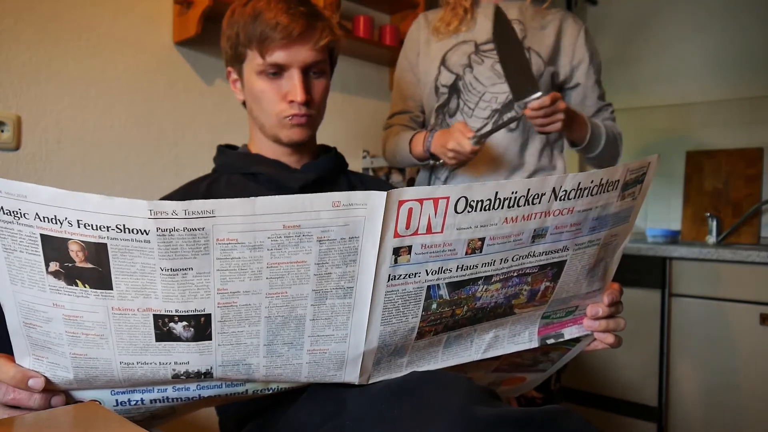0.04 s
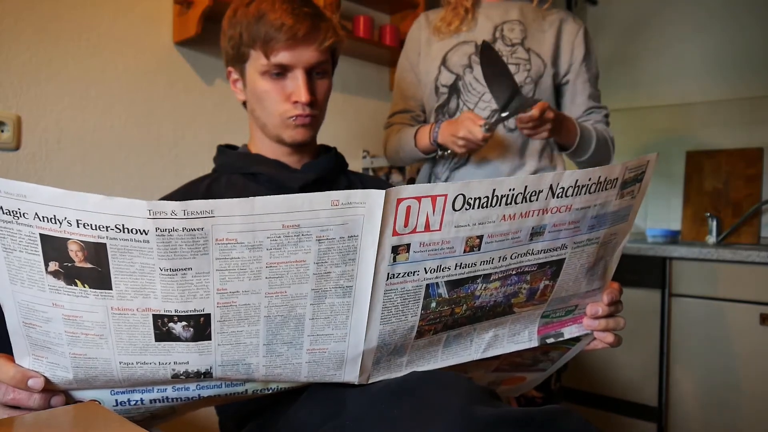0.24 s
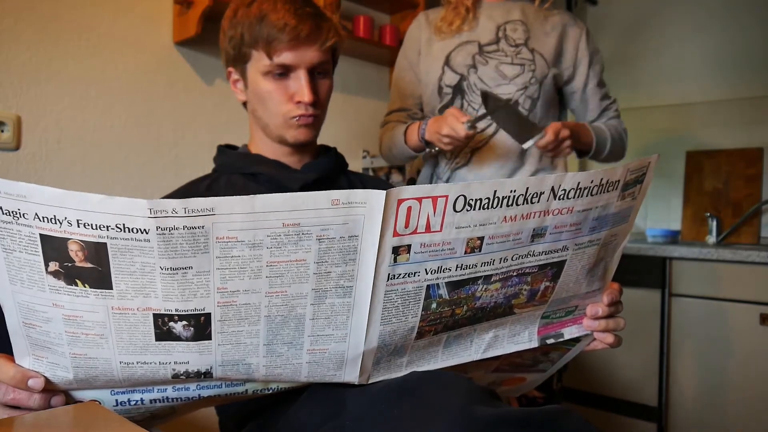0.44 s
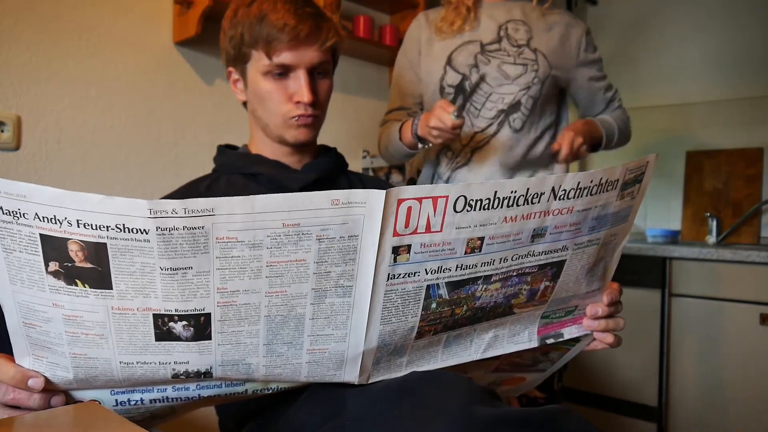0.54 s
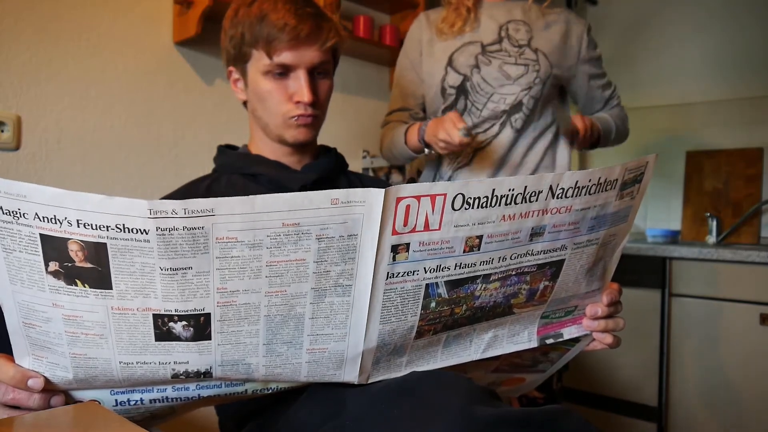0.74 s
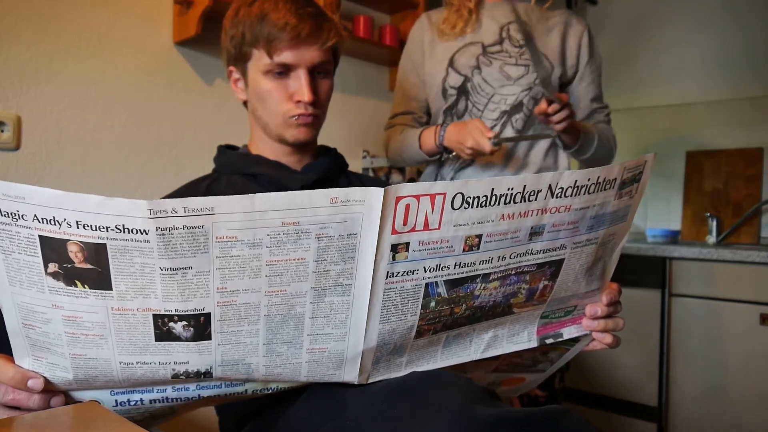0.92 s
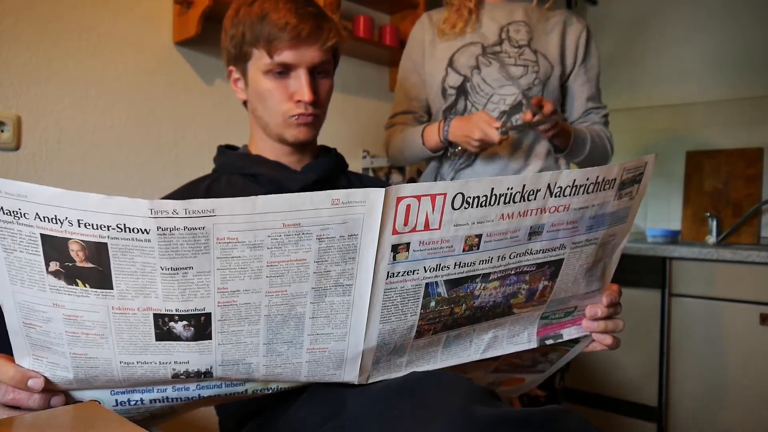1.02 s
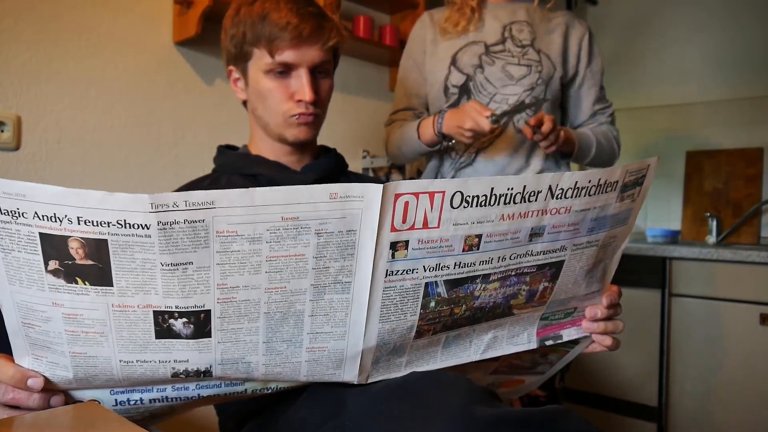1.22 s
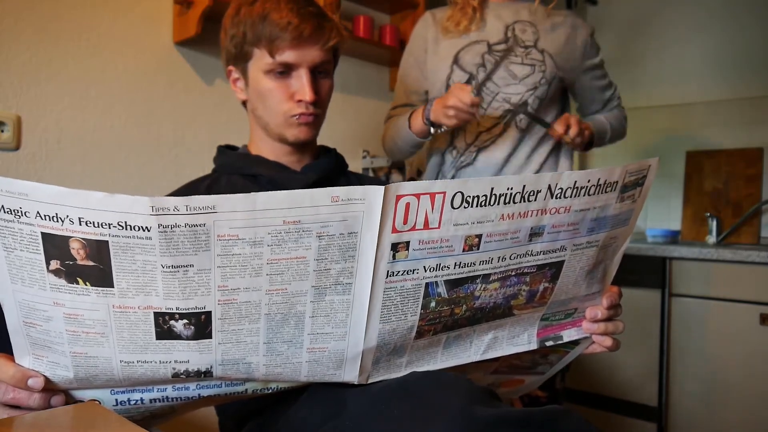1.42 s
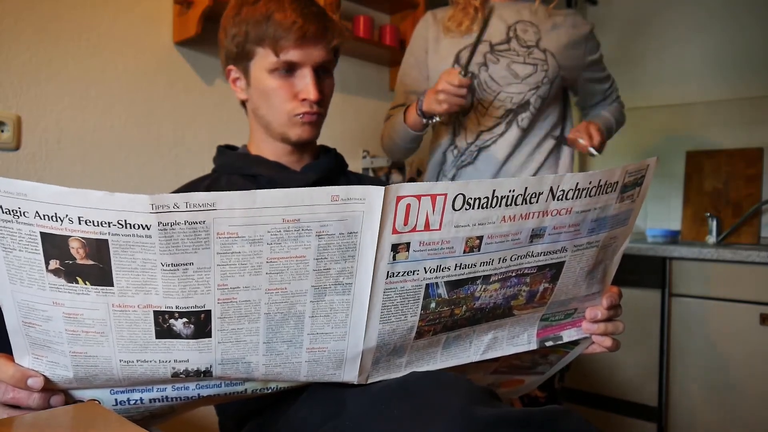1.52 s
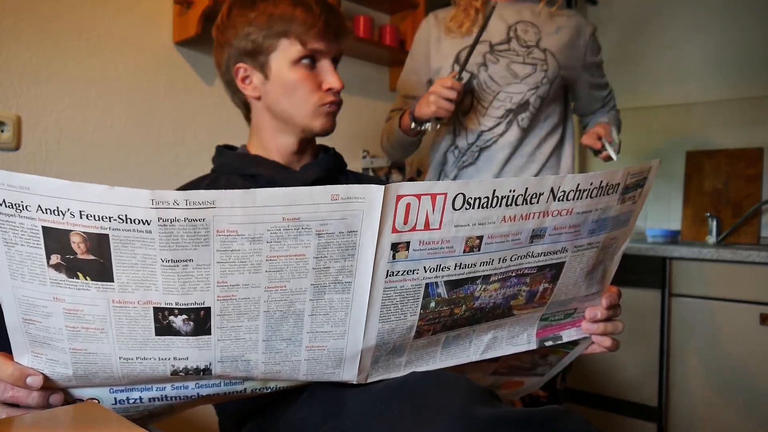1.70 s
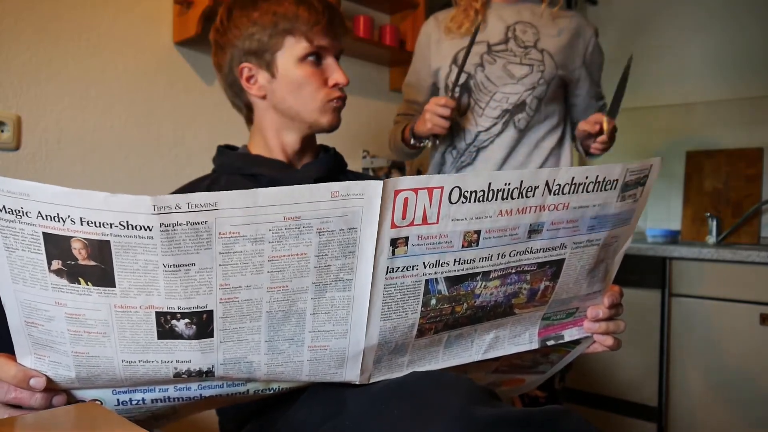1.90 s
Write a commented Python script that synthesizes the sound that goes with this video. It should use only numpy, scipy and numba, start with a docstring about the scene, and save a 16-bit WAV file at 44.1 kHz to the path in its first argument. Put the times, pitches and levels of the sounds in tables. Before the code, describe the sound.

A large knife is sharpened on a steel in a quiet, slightly echoing kitchen. After a faint rustle, the blade clashes down at 0.2 seconds and scrapes with thin squeaks, brightening until it slips off and rings at 0.5. A second scrape lands softly at 1.1 with a low buzz and rings off near 1.5. Faint handling ticks come around 0.8 and 1.9 seconds.

```python
"""A faint steel ring and a rustle in a quiet, hard-walled kitchen; then a large knife is drawn twice
along a honing steel. The blade clashes down (impact), grinds from heel to tip, growing brighter
(friction driving resonances), then slips off and rings (free vibration). The edge squeals as it catches
(stick-slip). The second stroke lands softly and makes the flexing blade buzz more loudly (bending
vibration). Faint handling ticks follow each stroke."""
import sys
import numpy as np
from scipy import signal
from scipy.fft import rfft, irfft
from scipy.io import wavfile
from scipy.ndimage import uniform_filter1d
from numba import njit

SR = 44100
rng = np.random.default_rng(int(sys.argv[2]) if len(sys.argv) > 2 else 0)


def output_pcm(signal):
    """Save a mono or channel-first signal as 16-bit PCM at the path in sys.argv[1].

    Samples are clipped to [-1, 1] before scaling.
    """
    pcm = np.clip(np.atleast_2d(signal).T, -1, 1) * 32767
    wavfile.write(sys.argv[1], SR, np.round(pcm).astype(np.int16))


N = 85995
t = np.arange(N) / SR
SIDE = np.array([[1], [-1]])  # added on the left, subtracted on the right


def undb(db):
    """Decibels to amplitude ratio."""
    return 10 ** (np.asarray(db) / 20)


def unit(x):
    """Normalisation to rms 1."""
    return x / np.sqrt(np.mean(x ** 2) + 1e-20)


def on_bins(points):
    """Log-frequency interpolation of (frequency [Hz], value) onto a double-length spectrum."""
    hz, value = np.array(points, float).T
    return np.interp(np.log(np.maximum(np.arange(N + 1) * SR / (2 * N), 1)), np.log(hz), value)


def shape(x, gain):
    """Convolution as a product of spectra."""
    return irfft(rfft(x, 2 * N) * gain)[..., :N]


def colour(x, spectrum):
    """Minimum-phase filtering by a folded cepstrum; keeps the power of white noise."""
    cepstrum = irfft(np.log(unit(undb(on_bins(spectrum)))))
    cepstrum[1:N] *= 2
    cepstrum[N + 1:] = 0
    return shape(x, np.exp(rfft(cepstrum)))


def wander(rate_hz):
    """Slow random modulation: smoothed random steps of rms 1."""
    hold = max(int(SR / rate_hz), 40)
    steps = rng.standard_normal(N // 20)[np.arange(N) // hold]
    return unit(uniform_filter1d(uniform_filter1d(steps, hold), hold))


def fade(start, decay_s):
    """Exponential decay from a sudden onset."""
    age = t - start
    return (age >= 0) * np.exp(-np.maximum(age, 0) / decay_s)


@njit
def one_pole(x, pole):
    """Damped oscillator: a complex state turns and shrinks at each sample."""
    state, y = 0j, np.empty(len(x))
    for i in range(len(x)):
        state = state * pole[i] + x[i] + 1e-18
        y[i] = state.imag
    return y


def resonate(x, hz, width_hz):
    """Forced resonance of variable centre and width; at its widest it keeps white-noise power."""
    pole = np.exp((2j * np.pi * hz - np.pi * width_hz) / SR) * np.ones(N)
    return one_pole(x, pole) * 2 * np.sqrt(np.pi * np.max(width_hz) / SR)


# background spectrum (frequency [Hz], relative level [dB])
BACKGROUND_SPECTRUM = [(15, -46.5), (25, -22), (70, -8.5), (130, 1.5), (301, 6), (516, 0), (796, -3),
                       (1400, -7.5), (1520, -5.5), (3520, -10.5), (9840, -13.5), (14800, -22), (16000, -40)]
def room_tone():
    """Stationary noise: a quiet background with independent mid and side."""
    mid, side = (colour(rng.standard_normal(N), BACKGROUND_SPECTRUM) for _ in range(2))
    return undb(-61) * (mid + undb(1.5) * side * SIDE)


def ring(start, hz, db, t60):
    """Free vibration: one mode decays as a damped sinusoid."""
    return undb(db) * np.sqrt(2) * fade(start, t60 / np.log(1000)) * np.sin(2 * np.pi * hz * (t - start))


COUPLING_DB = 5  # spread of a mode's wavering level
def lingering_ring():
    """Free decay: the blade still rings from an earlier stroke."""
    return ring(0, hz=3596, db=-53, t60=0.23) * undb(COUPLING_DB * wander(70))


def grit(clicks_per_s=9000, spread_db=3):
    """Shot noise: dense, uneven clicks, as of an edge crossing the ribs of the steel."""
    hits = rng.random(N) < clicks_per_s / SR
    sizes = rng.choice([-1, 1], N) * undb(spread_db * rng.standard_normal(N))
    return unit(hits * sizes)


# handling noises (time [s], level [dB], decay time [s])
TICKS = [(0.138, -55, 0.082), (0.837, -51, 0.0025), (.932, -59.5, 0.0021), (1.9177, -50, 0.0041),
         (1.93, -57.5, .05)]
# their spectrum (frequency [Hz], relative level [dB])
TICK_SPECTRUM = [(60, -35), (300, -12), (1500, -8.5), (3100, -3.5), (5200, -4.5), (6200, -9), (8500, -17.5),
                 (9800, -8), (12000, -22.5), (16000, -25)]
def ticks():
    """Contact noise of handling: short bursts tick, longer ones rustle."""
    envelope = sum(undb(db) * fade(start, decay_s) for start, db, decay_s in TICKS)
    return colour(envelope * grit(), TICK_SPECTRUM)


# the blade lands and bounces (time [s], level [dB])
BOUNCES = [(0.2168, -2), (0.218, -14), (0.2199, -10.5), (.2219, -9)]
# spectrum of the cracks (frequency [Hz], relative level [dB])
CRACK_SPECTRUM = [(40, -67), (200, -43), (800, -14), (2500, -21.5), (5000, -8.5), (7500, -2.5), (9500, 11),
                  (11000, 14), (12500, -17), (16000, -17.5)]
# modes of blade and steel
# (frequency [Hz], free t60 [s], relative level in the clash [dB], in stroke one [dB], in stroke two [dB])
MODES = [(2710, .3, -48.5, -26, -29.5), (3669, 0.65, -42.5, -17.5, -25), (3636, 0.88, -50, -24, -18),
         (4209, 0.42, -39.5, -11.5, -10), (4920, 0.53, -25, -15.5, -20), (5620, .28, -32.5, -17.5, -13),
         (5770, 0.3, -18.5, -18, -14), (6610, 0.47, -28, -8.5, -7.5), (7255, 0.57, -45.5, -28, -14.5),
         (7497, .35, -12, -12.5, -7.5), (8080, 0.33, -38, -15, -26), (8600, 0.2135, -40.5, -19, -23),
         (9600, 0.22, -22.5, -5, -22), (10100, .2, -29.5, -22.5, -31), (11400, 0.38, -44.5, -20, -36)]
def clash():
    """Impact excitation: steel cracks on steel in quick bounces, and the modes ring, soon damped."""
    start = BOUNCES[0][0]
    cracks = sum(undb(db) * fade(at, decay_s=0.00056) for at, db in BOUNCES) * rng.choice([-1, 1], N)
    ringing = sum(ring(start, hz, db, t60) for hz, t60, db, *_ in MODES)
    return colour(cracks, CRACK_SPECTRUM) + undb(-6.5) * ringing * fade(start, decay_s=.045)


# one curve per stroke (time [s], grinding level [dB], treble lift [dB])
STROKES = [
    [(.218, -25.5, 8.5), (.27, -30.5, -34.5), (.33, -30, -7), (.42, -36, 3.5), (.46, -31.5, 5),
     (.49, -33.5, 9), (.51, -34.5, 17), (.527, -28.5, 5.5)],
    [(1.093, -30, 3.5), (1.13, -33, -2.5), (1.18, -29, -5.5), (1.24, -33, -0.5), (1.29, -28, -1.5),
     (1.36, -31, 2), (1.40, -32.5, 7.5), (1.435, -26, 0), (1.465, -38, 4)],
]
# body of the grinding (frequency [Hz], relative level [dB])
RASP_SPECTRUM = [(60, -59), (150, -21.5), (350, -9.5), (800, -6.5), (1400, -2.5), (2000, -0.5), (3200, 7),
                 (4500, 9.5), (6500, 7), (10000, 3.5), (16000, -25)]
# treble that grows towards the tip (frequency [Hz], relative level [dB])
HISS_SPECTRUM = [(1000, -27), (3500, -28.5), (5000, -6.5), (7200, 1), (8200, -5), (9700, 2.5),
                 (11000, -1.5), (12200, -8.5), (15000, -10.5), (16500, -31)]
# grit reaches the modes mostly in the treble (frequency [Hz], relative level [dB])
DRIVE_SPECTRUM = [(300, -27), (2500, 2)]
TOUCH_S, SLIP_S, CONTACT_T60_S = 0.00095, 0.0037, 0.053
CONTACT_WANDER, SWING_DOPPLER = 0.0015, 0.0011  # fractions of a mode's frequency
def stroke(index):
    """Sliding friction drives the modes; contact damps them until the tip slips off and flicks them."""
    at, level_db, lift_db = np.array(STROKES[index]).T
    start, end = at[0], at[-1]
    contact = np.clip((t - start) / TOUCH_S, 0, 1) * np.exp(-np.maximum(t - end, 0) / SLIP_S)
    force = contact * undb(np.interp(t, at, level_db))
    lift = undb(np.interp(t, at, lift_db))
    travel = np.clip((t - start) / (end - start), 0, 1)  # 0 at the heel, 1 at the tip
    rasp = colour(force * grit(), RASP_SPECTRUM)
    hiss = colour(force * lift * grit(), HISS_SPECTRUM)
    grinding = rasp + undb(4) * hiss
    out = undb(-7) * grinding + undb(-6.5) * contact * pinned_blade(grinding, travel)
    drive = colour(force * np.sqrt(lift) * grit(), DRIVE_SPECTRUM)
    flick_db = level_db[-1] + lift_db[-1] / 2 - 1
    for hz, t60, _, *stroke_db in MODES:
        width_hz = np.log(1000) / np.pi * (contact / CONTACT_T60_S + (1 - contact) / t60)
        pitch = hz * (1 + (CONTACT_WANDER * contact + SWING_DOPPLER) * wander(30))
        forced = undb(-3) * resonate(drive, pitch, width_hz)
        free = ring(end, hz, flick_db, t60)
        out += (forced + free) * undb(stroke_db[index] + COUPLING_DB * wander(29.88))
    return out


CLIMB, SINK, GLIDE_KNEE_HZ = .13, .07, 6670  # above the knee, the glide in Hz stops growing
def pinned_blade(grinding, travel, count=54, low_hz=784.5, high_hz=15497, spread_db=2, flicker_db=4):
    """Length sets pitch: resonances climb on the contact's shortening side and sink on the other."""
    centres = np.linspace(np.sqrt(low_hz), np.sqrt(high_hz), count) ** 2
    out = 0
    for k, (hz, gap) in enumerate(zip(centres, np.gradient(centres))):
        offset, slope, strength = rng.uniform(-1., 1., 3)
        glide = (CLIMB if k % 2 else -SINK) * (1 + slope / 2) * min(1, GLIDE_KNEE_HZ / hz)
        pitch = (hz + offset * gap / 2) * (1 + glide * (travel - .5))
        gain = np.sqrt(2 * gap / SR) * undb(spread_db * strength + flicker_db * wander(25))
        out = out + resonate(grinding * gain, pitch, width_hz=55)
    return out


def wavering_tone(hz, width_hz):
    """Self-excited oscillation with random frequency modulation."""
    pitch = hz + width_hz / 2 * wander(160)
    return np.sqrt(2) * np.sin(2 * np.pi * np.cumsum(pitch) / SR)


# low bending resonance of the blade, one curve per stroke (time [s], frequency [Hz], level [dB])
BENDS = [
    [(.22, 443.4, -54), (.29, 488.5, -75), (.325, 445, -42.5), (.39, 546.6, -60), (.43, 647.4, -46.5),
     (.48, 770, -50), (.53, 864, -46.5)],
    [(1.089, 530, -31), (1.095, 521.4, -32), (1.125, 490, -32), (1.151, 478.8, -47.5), (1.2, 529, -42),
     (1.275, 589, -47.5), (1.31, 677, -51), (1.36, 702, -48.5), (1.43, 689, -56.5)],
]
BEND_WIDTH_HZ, HANDLE_HZ, HANDLE_WIDTH_HZ = 68.8, 311.4, 96
def flex(curve, roughness=0.38, flicker_db=2.5):
    """Bending vibration: the blade's rough tone climbs along the stroke, over the duller handle."""
    at, hz, db = np.array(curve).T
    pitch = np.interp(t, at, hz)
    force = undb(np.interp(t, at, db)) * (t > at[0]) * (t < at[-1])
    tone = wavering_tone(pitch, BEND_WIDTH_HZ / 2)
    buzz = unit(tone + roughness * resonate(grit(), pitch, BEND_WIDTH_HZ))
    handle = resonate(grit(), HANDLE_HZ, HANDLE_WIDTH_HZ)
    handle = unit(resonate(handle, HANDLE_HZ, HANDLE_WIDTH_HZ))  # twice, for steeper skirts
    flicker = unit(undb(flicker_db * wander(110)))
    return force * (buzz * flicker + undb(-7.5) * handle)


# the edge catches (time [s], duration [s], frequency [Hz], level [dB])
SQUEALS = [(0.245, 0.21, 1746, -46), (.372, 0.022, 4100, -29), (0.453, 0.016, 5140, -25.5),
           (1.129, 0.025, 3665, -27), (1.136, 0.052, 5014, -27.5)]
def squeals():
    """Stick-slip oscillation: short tones that swell and die."""
    out = 0
    for start, duration, hz, db in SQUEALS:
        swell = np.sin(np.pi * np.clip((t - start) / duration, 0, 1))
        out = out + undb(db) * swell * wavering_tone(hz, width_hz=60.1)
    return out


# reverberation time of the kitchen (frequency [Hz], t60 [s])
ROOM_T60 = [(200, 0.31), (1000, 0.65), (4000, 0.47), (8000, 0.41), (14000, 0.23)]
# stereo width of the reflections (frequency [Hz], side over mid [dB])
ROOM_WIDTH = [(100, 6), (300, -3.5), (1000, -1.5), (2200, -3.5), (4500, -8), (9000, -6.5), (14000, -0.5)]
def kitchen(x, gap_s=0.006, build_s=0.002):
    """Diffuse reverberation: dense reflections, left and right, that die sooner in the treble."""
    build = 1 - np.exp(-np.maximum(t - gap_s, 0) / build_s)
    noise, tail = rng.standard_normal((2, N)), 0
    for hz, t60 in ROOM_T60:
        band = on_bins([(f, f == hz) for f, _ in ROOM_T60])
        envelope = unit(build * np.exp(-np.log(1000) * t / t60)) / np.sqrt(N)
        tail = tail + shape(noise, band) * envelope
    mid, side = undb(-3) * shape(x, rfft(tail, 2 * N))
    return mid + SIDE * shape(side, undb(on_bins(ROOM_WIDTH)))


# stereo balance (frequency [Hz], left over right [dB])
BALANCE = [(150, 5), (400, -2), (800, -2), (2400, -.3), (4400, 1.5), (8100, 0.5), (15000, -4)]
def scene():
    """Superposition of direct and reflected sound; the thin blade radiates little bass."""
    bass_cut = signal.butter(4, 170, "high", fs=SR, output="sos")
    strokes = sum(stroke(index) for index in range(len(STROKES)))
    friction = signal.sosfilt(bass_cut, strokes) + squeals() + ticks()
    bending = signal.sosfilt(bass_cut, sum(flex(curve) for curve in BENDS))
    landing = clash()
    direct = friction + bending + landing + lingering_ring()
    reflected = kitchen(friction + undb(-3.5) * bending + undb(-10.5) * landing)
    return shape(direct + reflected, undb(SIDE / 2 * on_bins(BALANCE))) + room_tone()


NOTCH_HZ, NOTCH_WIDTH_HZ, CEILING, TOP_HZ = 7800, 170, .85, 15700
def record(dry):
    """Filtering and clipping: a narrow treble dip, a ceiling on the peaks and a steep top cut."""
    notch = signal.iirnotch(NOTCH_HZ, NOTCH_HZ / NOTCH_WIDTH_HZ, fs=SR)
    top_cut = signal.ellip(8, .2, 70, TOP_HZ, fs=SR, output="sos")
    clipped = np.clip(signal.lfilter(*notch, dry), -CEILING, CEILING)
    return signal.sosfilt(top_cut, clipped)


dry = scene()
out = record(dry)
output_pcm(out)
```